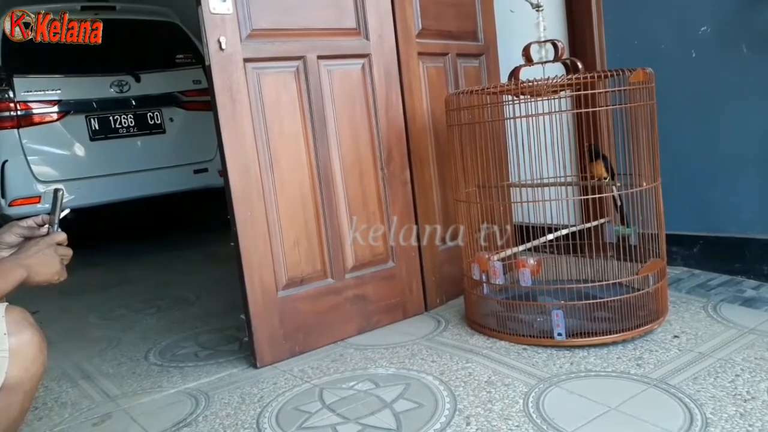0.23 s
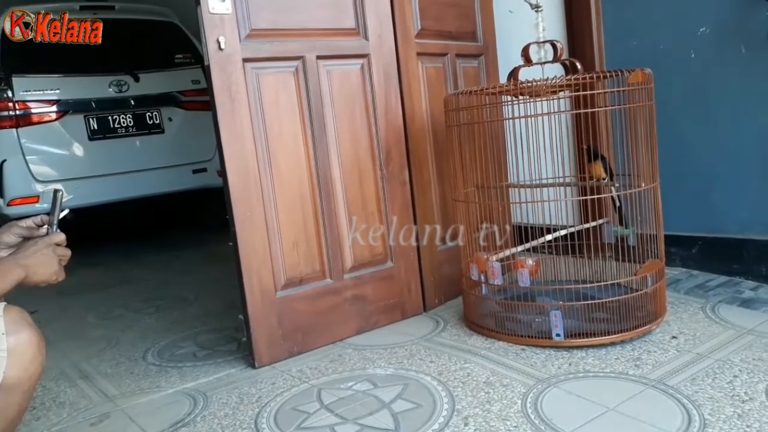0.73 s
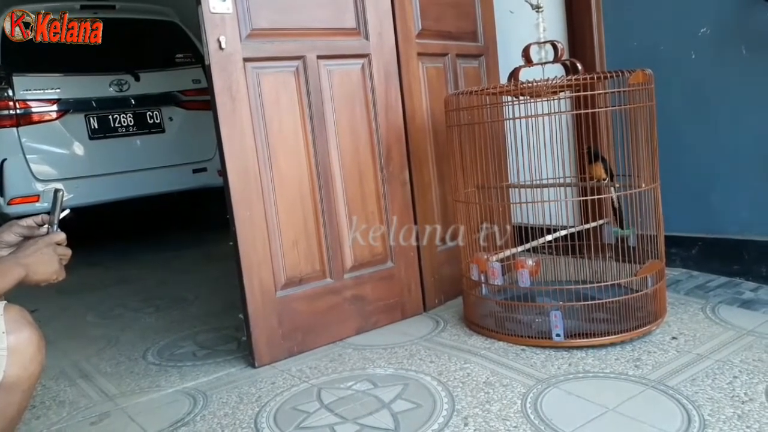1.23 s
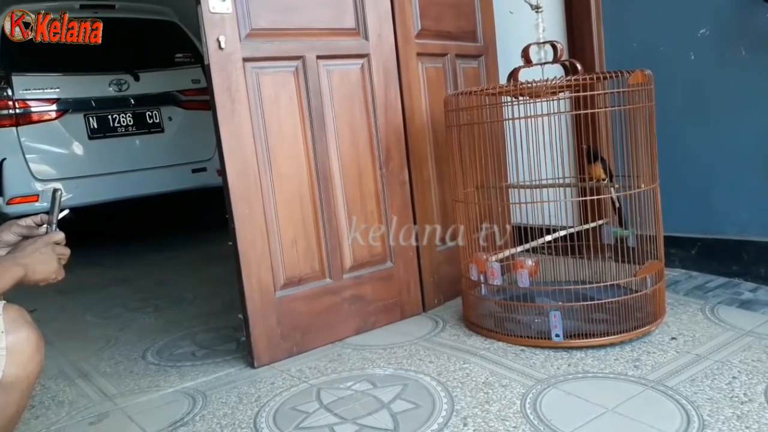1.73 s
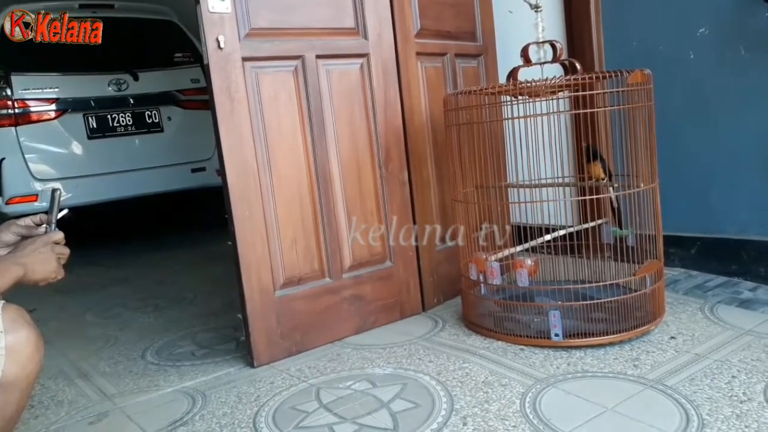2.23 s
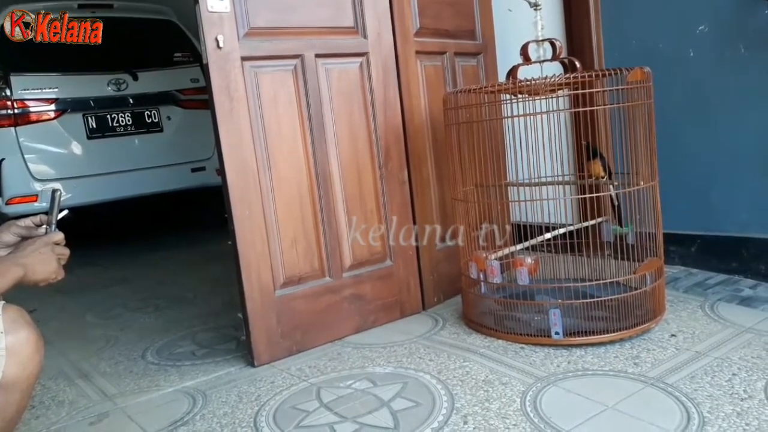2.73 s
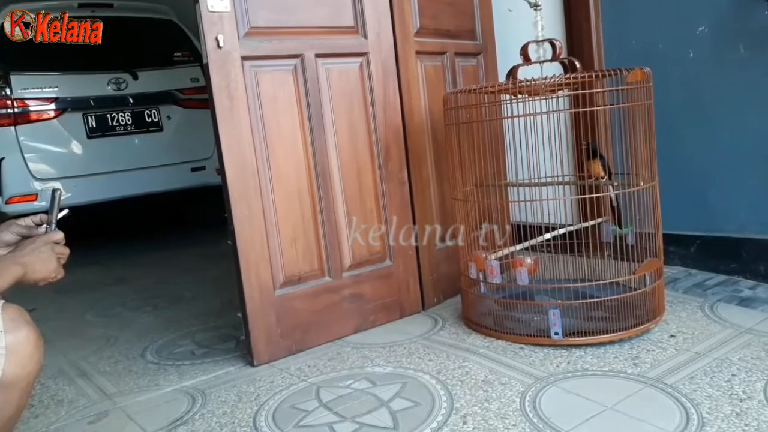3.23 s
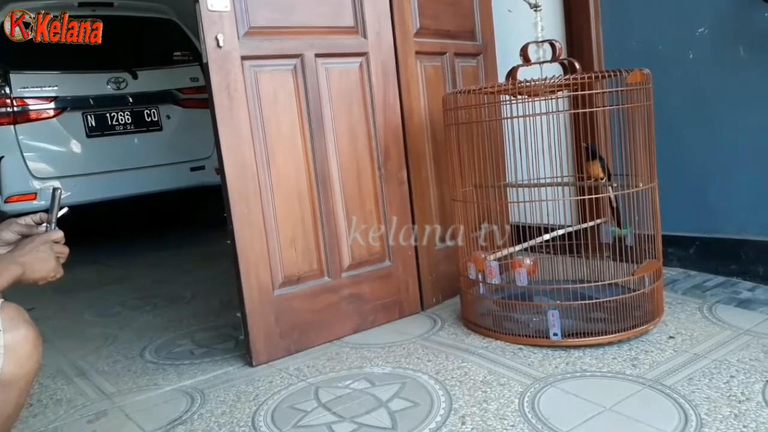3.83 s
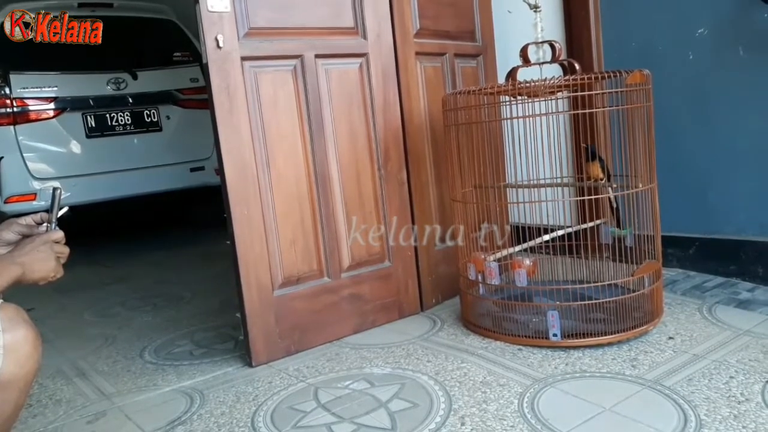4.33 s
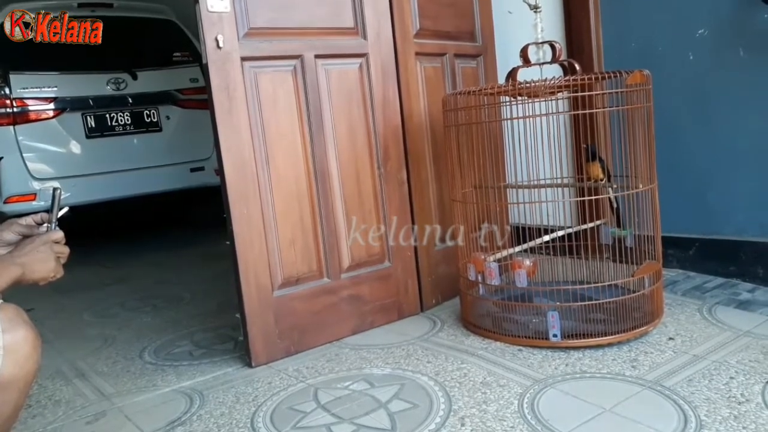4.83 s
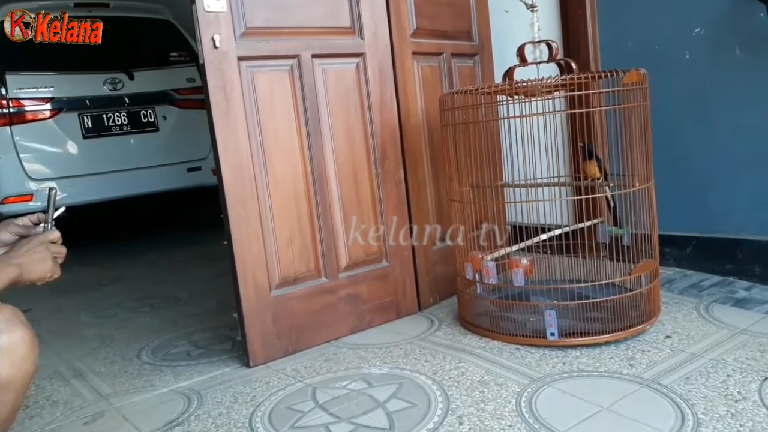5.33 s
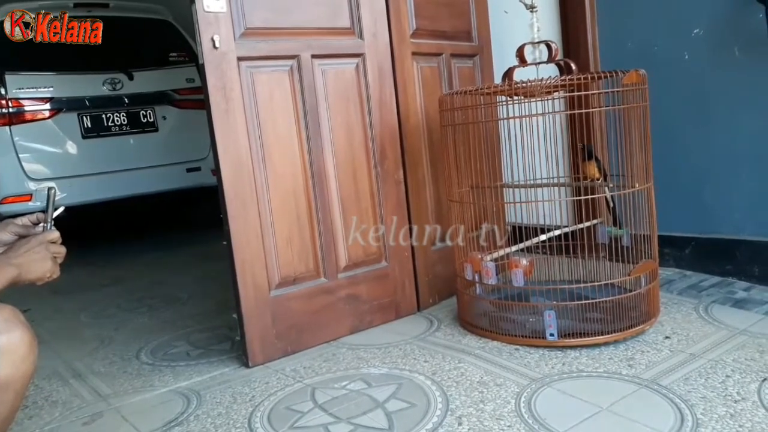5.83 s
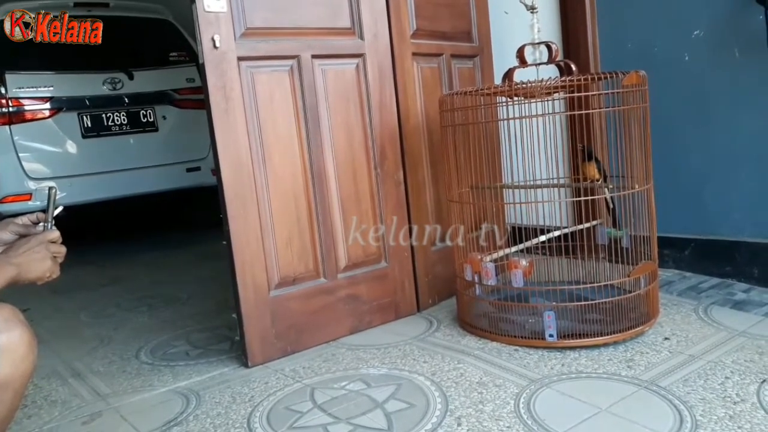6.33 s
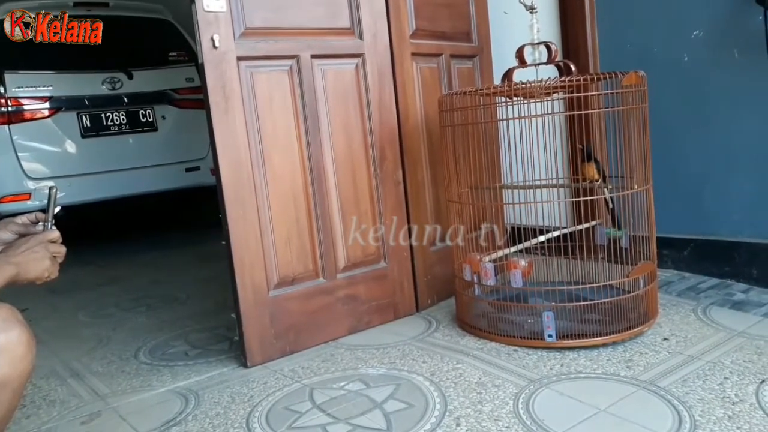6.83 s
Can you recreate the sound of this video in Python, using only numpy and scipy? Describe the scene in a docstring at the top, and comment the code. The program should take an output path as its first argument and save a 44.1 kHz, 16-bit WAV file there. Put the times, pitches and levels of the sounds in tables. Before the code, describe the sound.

Close, ringing birdsong in repeated whoops, piercing swoops and rising whistles, with a faint distant dove coo and low traffic hiss.

```python
"""A caged songbird on a tiled porch, a few metres from a phone, opens with falling whoops led in by low whistles.
Swoops cut off by steep flicks and rising whistles follow, with a dove's coo far off in mid-song, then quick chips.
Each note is a gliding sine with overtones; the floor and hard walls together answer louder than the bird.
Street hiss and hum, made of coloured noise, run throughout, with a few faint short tones.
The loudest notes overload the input."""
import sys
import numpy as np
from scipy import signal
from scipy.fft import rfft, irfft, next_fast_len
from scipy.io import wavfile
from scipy.ndimage import uniform_filter1d, map_coordinates

SR = 44100
rng = np.random.default_rng(int(sys.argv[2]) if len(sys.argv) > 2 else 0)


def voltage_ratio(decibels):
    """Convert decibels (scalar or array-like) to amplitude ratios, 20 dB per decade."""
    exponent = np.asarray(decibels, float) / 20
    return 10 ** exponent


def to_wav(sig):
    """Store sig (one row per channel, or 1-D mono) as 16-bit WAV at the path in sys.argv[1].

    Samples outside -1..1 are clipped; the rate is SR.
    """
    pcm = np.clip(np.atleast_2d(sig), -1, 1) * 32767
    pcm = np.round(pcm).astype(np.int16)
    wavfile.write(sys.argv[1], SR, pcm.T)  # frames by channels


N = 311787
LEAD_IN = SR // 4  # samples ahead of the scene, so that a note may already be sounding at its start
STEP_S = 0.001  # spacing of the points along a note

# Falling whoops. Each row: start in seconds, start pitch in Hz, relative level in dB, stretch in time (factor).
WHOOPS = [(-.115, 2424, -10.5, 0.7), (0.079, 2300, -10.5, 1.01), (.337, 2351, -10.5, 0.87),
          (1.341, 2342, -10, 0.96), (1.655, 2342, -9.5, 1.186), (1.936, 2382, -9, 1.064),
          (2.197, 2410, -11, 1.01), (2.432, 2352, -11, 0.93), (2.683, 2358, -9, 1.01)]
# Overtones of whoops and lead-in whistles: relative level in dB of multiples 2, 3, ..
LOW_OVERTONES = [-27.5, -33, -31, -49.5, -30, -48.5]
# Overtones of swoops, flicks and rising whistles: relative level in dB of multiples 2, 3, ..
HIGH_OVERTONES = [-24, -28, -21.5]
# The high voice is loudest in its middle. Each row: pitch in Hz, level change in dB.
HIGH_LOUD = [(2800, -13.5), (3300, -16.5), (3700, -0.5), (4000, -2), (4300, -2), (4650, -5.5),
             (5200, -14.5), (5700, -20.5), (6400, -13)]
# How rich the high whistles are at each pitch. Each row: pitch in Hz, overtone change in dB.
WHISTLE_RICH = [(2800, -19), (3300, 4), (3550, -7.5), (3780, -10), (4000, -2.5), (4300, 0.5), (4600, 5),
                (5000, 9.5), (6000, 1.5)]
# Equally rich at every pitch. Each row: pitch in Hz, overtone change in dB.
EVEN = [(1000, 0)]


def unit(x):
    """x at rms 1."""
    return x / np.sqrt(np.mean(x ** 2) + 1e-20)


def along(points, hz):
    """Reads a curve of (Hz, value) points on a log frequency axis."""
    f, v = np.transpose(points)
    return np.interp(np.log(hz + 1), np.log(f + 1), v)


def filtered(x, points):
    """x coloured by (Hz, dB) points."""
    m = next_fast_len(len(x) + 8192)
    gain = voltage_ratio(along(points, np.fft.rfftfreq(m, 1 / SR)))
    return irfft(rfft(x, m) * gain, m)[:len(x)]


def steps(length):
    """Times along a note in seconds."""
    return np.arange(0, length, STEP_S)


def wander(places):
    """Smooth random curve read at the given places, one fresh value per whole number."""
    return map_coordinates(rng.standard_normal(64), [places], mode="wrap")


def add(out, s, hz, db, overtones_db, richness):
    """Adds one note from s on, pitch and level given every step: a gliding sine and its multiples, with soft ends."""
    t = np.arange(round((len(hz) - 1) * STEP_S * SR)) / SR
    points_s = STEP_S * np.arange(len(hz))
    hz, db = (uniform_filter1d(np.interp(t, points_s, v), size=80, mode="nearest") for v in (hz, db))
    rich = voltage_ratio(0.18 * (db - db.max()) + along(richness, hz))  # overtones grow with effort
    flutter = wander(t * 110)  # the voice is never quite steady
    hz = hz * (1 + 0.0047 * flutter)
    db = db + 2.44 * flutter[::-1]
    phase = 2 * np.pi * (np.cumsum(hz) / SR + rng.random())
    overtones = 0
    for k, level in enumerate(overtones_db, 2):
        audible = hz * k < SR / 2.5  # leaves out what lies too high
        overtones = overtones + voltage_ratio(level) * audible * np.sin(k * phase)
    ends = np.clip(np.minimum(t, t[-1] - t) / 0.004, 0, 1)
    out[LEAD_IN + round(s * SR):][:len(t)] += voltage_ratio(db) * ends * (np.sin(phase) + rich * overtones)


def street():
    """Far traffic and air: a smooth hiss over a low hum that swells, both coloured noise."""
    # Colour of the hiss. Each row: frequency in Hz, relative density in dB per Hz.
    hiss_colour = [(240, -44), (400, -8.5), (600, -5.5), (700, -8.5), (1100, -11), (1500, -8), (2700, -12),
                   (3600, -9), (4900, -22), (6200, -27.5), (8500, -17.5), (9400, -28.5), (10300, -41),
                   (15600, -39)]
    # Colour of the hum. Each row: frequency in Hz, relative density in dB per Hz.
    hum_colour = [(24, -41), (40, -13.5), (103, -1.5), (193, -2.5), (222, -7.5), (377, -9.5), (420, -26.5),
                  (550, -47.5), (920, -120)]
    # Swell of the hum. Each row: time in seconds, rms level in dB.
    hum_swell = [(0.0, -54), (0.49, -54), (3.52, -54.5), (4.75, -50.5), (5.57, -55), (7.07, -51)]
    s, db = np.transpose(hum_swell)
    hiss = voltage_ratio(-50.5) * unit(filtered(rng.standard_normal(N), hiss_colour))
    hum = unit(filtered(rng.standard_normal(N), hum_colour))
    return hiss + voltage_ratio(np.interp(np.arange(N) / SR, s, db)) * hum


def short_tones(calls):
    """Faint short tones: plain sines, each around one pitch; the one at 2.8 s carries on the low end of the
    last whoop."""
    # Each row: start in seconds, pitch in Hz, relative level in dB, length in seconds.
    tones = [(0.58, 600, -54, 0.056), (1.07, 3197, -60.5, 0.085), (2.806, 600, -52.5, 0.054),
             (3.171, 607, -55.5, 0.045), (3.745, 1066, -62.5, 0.049), (5.619, 2322, -63, 0.073)]
    for s, hz, db, length in tones:
        level = np.ones_like(steps(length))
        add(calls, s, hz * level, db * level, [], EVEN)


def far_dove(calls):
    """A dove's coo: the pitch arches up and back, then lingers low as the call tires."""
    # One row: start in seconds, length of the arch in seconds, low pitch in Hz, top pitch in Hz.
    coo = (3.975, .39, 590, 890)
    trail_s, tires_db_per_s = 0.11, 19
    s, length, low, top = coo
    t = steps(length + trail_s)
    arch = np.sin(np.pi * np.minimum(t / length, 1)) ** 1.1
    db = -51 - 2.5 * (1 - arch)  # softer at its low ends
    db = db - tires_db_per_s * t - 0.5 * wander(25 * t)  # comes and goes
    add(calls, s, low + (top - low) * arch, db, [-14, -18], EVEN)


def dove_and_tones():
    """The dove and the faint short tones."""
    faint = np.zeros(LEAD_IN + N)
    far_dove(faint)
    short_tones(faint)
    return faint


def porch(x, early_db, late_db):
    """Dense answers of tiles and doors that die fast, over a slower tail; each band has its own speeds."""
    # Each row: frequency in Hz, early t60 in seconds, late t60 in seconds.
    decay = [(600, 0.16, 0.57), (1200, 0.25, 1), (2300, 0.23, 1), (4000, 0.21, 0.87), (7800, 0.23, 0.74),
             (10500, 0.054, 0.54), (15000, .15, .36)]
    hz, t, z = signal.stft(rng.standard_normal(SR), SR, nperseg=256)
    points, *t60s = np.transpose(decay)
    early, late = (voltage_ratio(-60 * t / along(np.transpose([points, t60]), hz)[:, None]) for t60 in t60s)
    envelope = voltage_ratio(early_db) * early + voltage_ratio(late_db) * late
    tail = signal.istft(z * envelope, SR, nperseg=256)[1][:SR]
    # the crowd of reflections builds up after the first few
    arrive = np.clip((np.arange(SR) / SR - 0.005) / 0.00083, 0, 1)
    return signal.fftconvolve(x, arrive * tail)[:len(x)]


def echoes(x, floor_db):
    """Delayed copies: one strong bounce off the tiled floor and others off the nearest doors and walls."""
    # The tiles answer sooner once the bird shifts on its perch. Each row: time in seconds, delay in ms.
    floor = [(0, 4.09), (2.9, 4.09), (2.94, 3.31), (7.07, 3.31)]
    # Answers from doors and walls: delays in ms.
    wall_ms = [10.02, 12.68, 13.45, 15.1, 17.89]
    # The same answers: levels in dB.
    wall_db = [-3.5, -12.5, -23.5, -46, -24.5]
    n = np.arange(len(x))
    s, ms = np.transpose(floor)
    delay = np.interp((n - LEAD_IN) / SR, s, ms) * SR / 1000
    out = voltage_ratio(floor_db) * map_coordinates(x, [n - delay])
    for ms, db in zip(wall_ms, wall_db):
        out = out + voltage_ratio(db) * np.roll(x, round(ms * SR / 1000))
    return out


def leads(song):
    """Low whistles that start flat, peak, drop to a held level and last until the next whoop."""
    # Each row: start in seconds, time to the peak in seconds, final pitch in Hz, peak in dB, held level in dB
    # (both levels relative).
    lead_rows = [(.066, .007, 2330, -8.5, -13.5), (0.311, .008, 2510, -15, -13),
                 (1.188, .02, 2345, -17, -21), (1.624, .008, 2405, -15.5, -33.5),
                 (1.906, .021, 2466, -10, -23.5), (2.18, .011, 2480, -12, -16.5),
                 (2.417, .012, 2320, -23.5, -35), (2.66, .006, 2400, -14, -35)]
    scoop, settles = 0.07, 0.26  # flat by this share of the pitch, settling in this share of the length
    rise_db, drop_db_per_s = 19, 1799.5
    end_db, end_s, overlap_s = 11.5, 0.016, 0.00092
    for s, peak, hz, peak_db, held_db in lead_rows:
        length = min(whoop[0] for whoop in WHOOPS if whoop[0] > s) + overlap_s - s
        t = steps(length)
        rise = peak_db - rise_db * (1 - t / peak)
        drop = np.maximum(peak_db - drop_db_per_s * (t - peak), held_db)
        db = np.where(t < peak, rise, drop)
        db = db - end_db * np.maximum(1 - (length - t) / end_s, 0)
        hz = hz * (1 - scoop * np.exp(-t / (settles * length)))
        add(song, s, hz, db, LOW_OVERTONES, EVEN)


def whoops(song):
    """A whoop holds briefly, sinks to a shelf, rests there and slides off it as it dies."""
    # Lower is softer. Each row: pitch in Hz, level change in dB.
    loud = [(600, -46.5), (780, -29.5), (880, -16.5), (1000, -17), (1250, -15.5), (1650, -3.5),
            (1850, -0.5), (2080, 1), (2350, 6.5)]
    # How rich the voice is at each pitch. Each row: pitch in Hz, overtone change in dB.
    rich = [(600, -8.5), (880, -11), (1000, 7), (1900, -4), (2350, -5)]
    # times are those of a whoop of stretch 1; the shelf and slide are shares of the start pitch
    length_s, hold_s, sink_s, sink_bend = 0.1108, 0.0015, 0.031, 1.3
    shelf, slide_s, slide_per_s = 0.365, 0.085, 3.4
    attack_s, attack_db = 0.0033, 2
    for s, hz, db, stretch in WHOOPS:
        t = steps(length_s * stretch) / stretch
        sink = np.exp(-(np.maximum(t - hold_s, 0) / sink_s) ** sink_bend)
        slide = slide_per_s * np.maximum(t - slide_s, 0)
        hz = hz * (shelf + (1 - shelf) * sink - slide)
        shape_db = along(loud, hz) - attack_db * np.maximum(1 - t / attack_s, 0)
        add(song, s, hz, db + shape_db, LOW_OVERTONES, rich)


def swoops(song):
    """Whistles that fall from the top, settle, drift and sag in level."""
    # Each row: start in seconds, length in seconds, settled pitch in Hz, drift in Hz per second,
    # relative peak level in dB.
    swoop_rows = [(2.965, 0.076, 3966, -6800, -12.5), (4.635, 0.11, 3954, -900, -8),
                  (5.913, .108, 3863, 2201, -7)]
    fall_hz, settle_s, bend = 1462, 0.021, 1.8
    hold_s, sag_db = 0.053, 12.5
    for s, length, settled, drift, db in swoop_rows:
        t = steps(length)
        hz = settled + drift * t + fall_hz * np.exp(-(t / settle_s) ** bend)
        shape_db = along(HIGH_LOUD, hz) - np.interp(t, [hold_s, length], [0, sag_db])
        add(song, s, hz, db + shape_db, HIGH_OVERTONES, WHISTLE_RICH)


def flicks(song):
    """The steep fall that cuts a swoop off: it speeds up, then eases down a little further."""
    # Each row: start in seconds, top pitch in Hz, bottom pitch in Hz, fall in seconds, relative level in dB.
    flick_rows = [(3.071, 5250, 2990, .02, -7.5), (4.74, 5527, 3365, .029, -9.5),
                  (6.016, 5446, 3174, 0.028, -6)]
    bend, foot_s, foot_hz = 1.4, 0.0077, 328
    onset_hz, onset_s = 1095, 0.002995  # it breaks in above its top pitch
    for s, top, bottom, length, db in flick_rows:
        t = steps(length + foot_s)
        fall = (bottom - top) * np.minimum(t / length, 1) ** bend
        hz = top + fall + onset_hz * np.exp(-t / onset_s)
        hz = hz - foot_hz * np.maximum(t - length, 0) / foot_s
        add(song, s, hz, db + along(HIGH_LOUD, hz), HIGH_OVERTONES, WHISTLE_RICH)


def rises(song):
    """Whistles that scoop up to a pitch, glide upward and end in an upward jerk."""
    # Each row: start in seconds, length in seconds, held pitch in Hz, climb in Hz per second,
    # relative level in dB.
    rise_rows = [(3.271, 0.11, 3636, 5880, -16), (3.503, .107, 3734, 990, -11.5),
                 (3.758, 0.11, 3627, 2350, -12.5)]
    from_hz, scoop_s, attack_s, attack_db = 2830, 0.009, 0.015, 26
    jerk_s, jerk_hz, jerk_fade_db, sag_db = 0.014, 4470, 15.5, 4.5
    for s, length, held, climb, db in rise_rows:
        t = steps(length)
        hz = held + climb * t - (held - from_hz) * np.exp(-t / scoop_s)
        jerk = np.clip(1 - (length - t) / jerk_s, 0, 1)
        shape_db = np.interp(t, [0, attack_s, length], [-attack_db, 0, -sag_db])
        shape_db = shape_db - jerk_fade_db * np.sqrt(jerk)
        add(song, s, hz + (jerk_hz - hz) * jerk, db + shape_db, HIGH_OVERTONES, WHISTLE_RICH)


def chips(song):
    """Quick falls, softer in mid-fall; after landing the pitch lifts a little as the chip stops."""
    # Each row: start in seconds, top pitch in Hz, bottom pitch in Hz, fall in seconds, relative level in dB.
    chip_rows = [(6.179, 5150, 3455, 0.018, -29), (6.257, 5200, 3453, 0.026, -29),
                 (6.348, 5600, 3580, .021, -24), (6.448, 5950, 3466, 0.02, -20.5),
                 (6.541, 5400, 3640, 0.022, -25.5), (6.65, 5350, 3460, .02, -27.5)]
    # Relative level in dB of multiples 2, 3, ..
    chip_overtones = [-23.5, -33.5, -40]
    # How rich the voice is at each pitch. Each row: pitch in Hz, overtone change in dB.
    rich = [(3400, 18), (4400, 5.5), (5200, -10.5)]
    foot_s, foot_hz = 0.013, 100
    for s, top, bottom, length, db in chip_rows:
        t = steps(length + foot_s)
        corners = [0, length / 2, length, length + foot_s]
        hz = np.interp(t, corners, [top, (top + bottom) / 2, bottom, bottom + foot_hz])
        shape_db = np.interp(t, corners, [4, -0.5, 0, -17])
        add(song, s, hz, db + shape_db, chip_overtones, rich)


def songbird():
    """The whole song, coloured by the microphone; every kind of note repeats one shape."""
    # Colour of the microphone. Each row: frequency in Hz, gain in dB.
    mic = [(500, -6), (2500, 0.77), (4000, 0), (5200, -6), (6200, -12.5), (7200, 0), (8600, 17.5),
           (9400, 5), (10200, -2.5), (11500, 6), (13000, 5), (14100, 3), (15200, -3.5), (15700, -1.5)]
    song = np.zeros(LEAD_IN + N)
    for notes in (leads, whoops, swoops, flicks, rises, chips):
        notes(song)
    return filtered(song, mic)


def scene():
    """The street, the dove and faint tones, and the bird with its echoes."""
    # The bird sings across the porch, so less treble comes straight. Each row: frequency in Hz, gain in dB.
    shadow = [(3000, 0.28), (6000, -2), (12000, -4)]
    bird, faint = songbird(), dove_and_tones()
    straight = filtered(bird, shadow)
    song = straight + echoes(straight, floor_db=-2.0) + porch(bird, early_db=-27.5, late_db=-38.0)
    behind = 1.4 * faint + porch(faint, early_db=-28.5, late_db=-30.5)
    return ((song + behind)[LEAD_IN:] + street())[None]


def top_cut(x):
    """Nothing passes above the cut-off."""
    return signal.sosfilt(signal.butter(12, 15770, fs=SR, output="sos"), x)


def record(dry):
    """The input stage flattens the loudest peaks."""
    full_scale, knee = 0.745, 16  # amplitude limit; hardness of its corner
    flat = dry / (1 + np.abs(dry / full_scale) ** knee) ** (1 / knee)
    return top_cut(flat)


dry = scene()
out = record(dry)
to_wav(out)
```